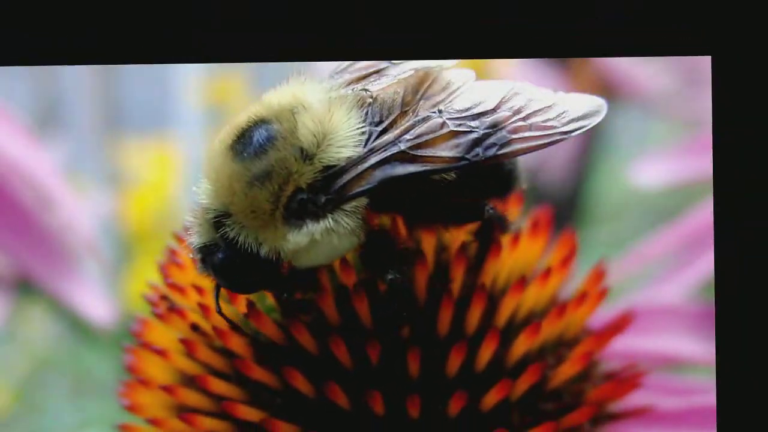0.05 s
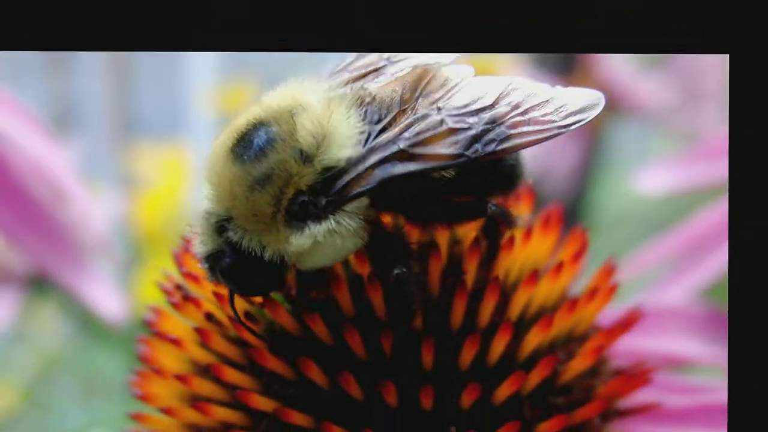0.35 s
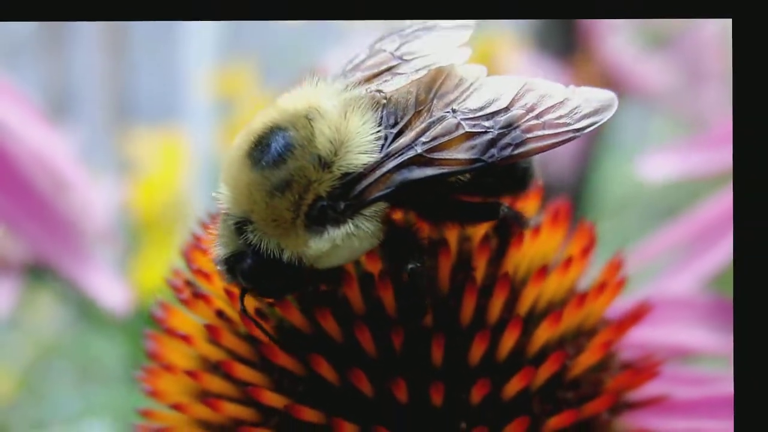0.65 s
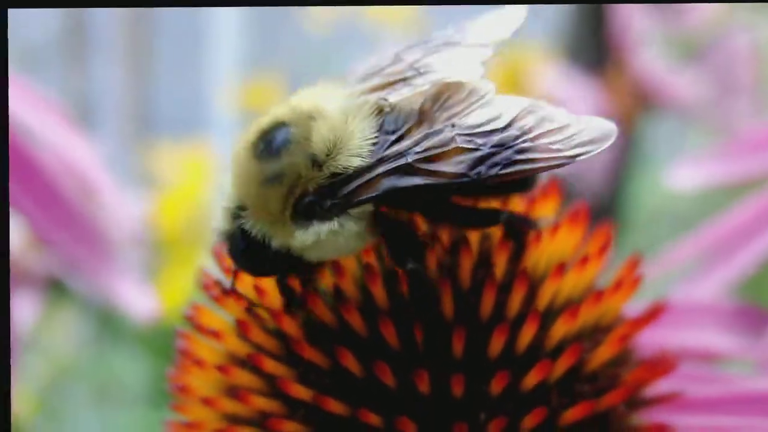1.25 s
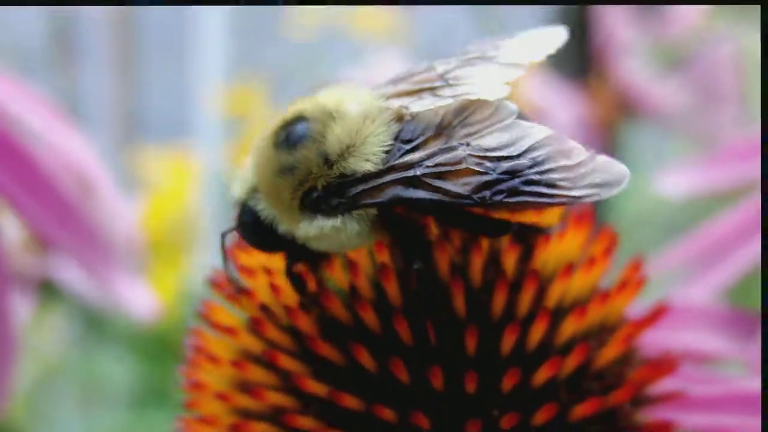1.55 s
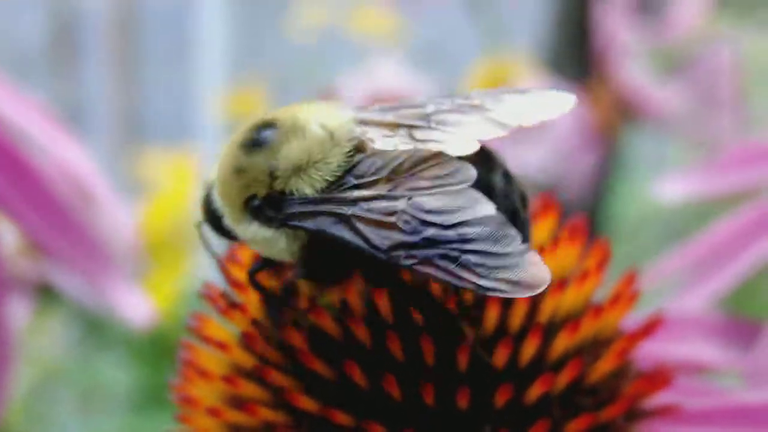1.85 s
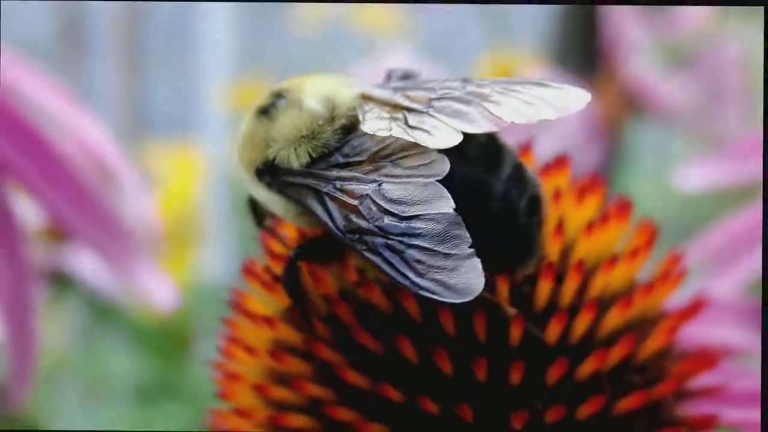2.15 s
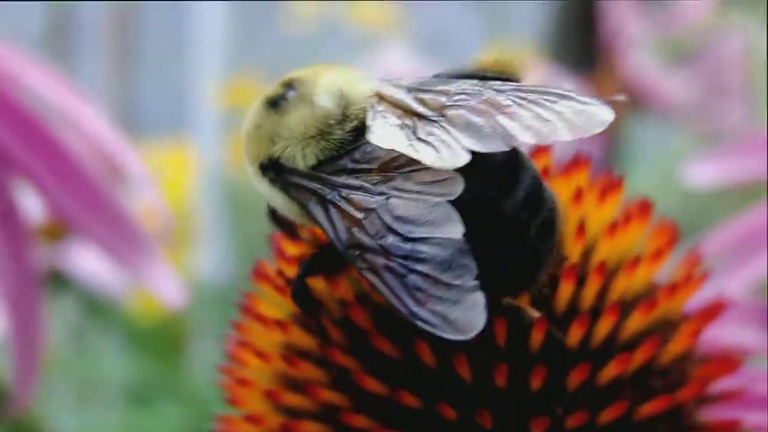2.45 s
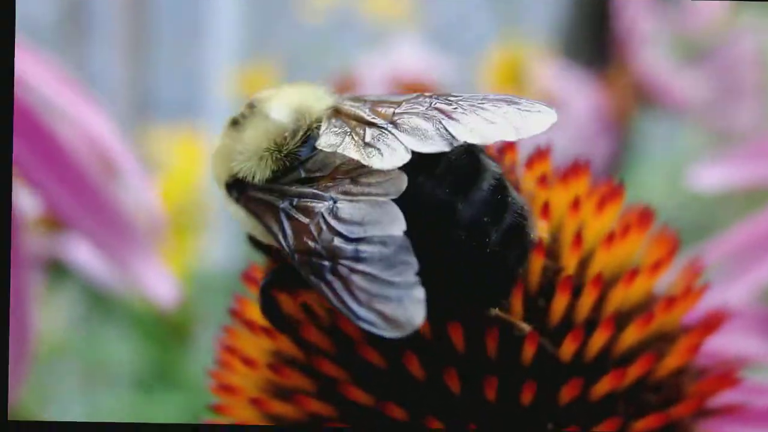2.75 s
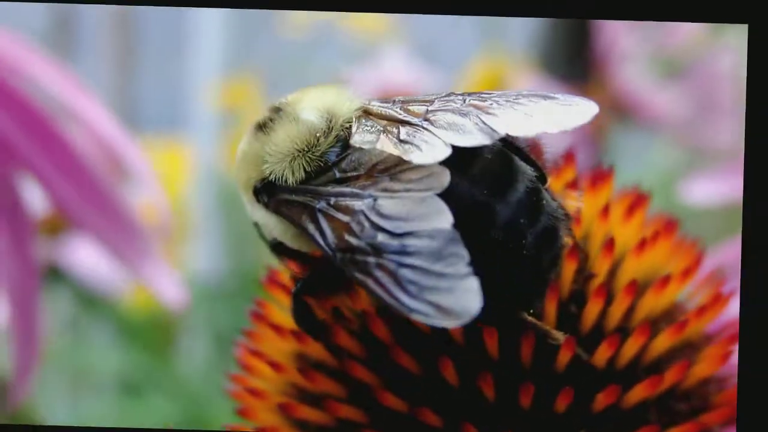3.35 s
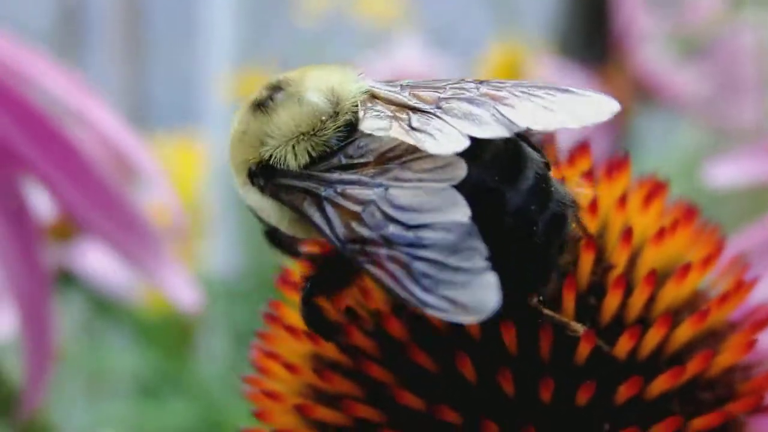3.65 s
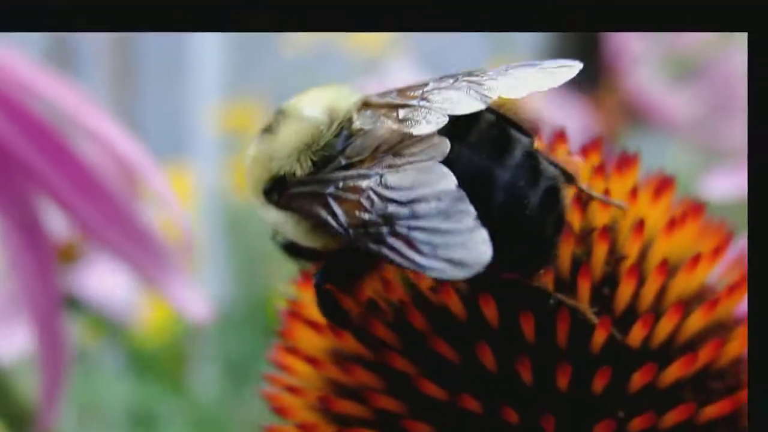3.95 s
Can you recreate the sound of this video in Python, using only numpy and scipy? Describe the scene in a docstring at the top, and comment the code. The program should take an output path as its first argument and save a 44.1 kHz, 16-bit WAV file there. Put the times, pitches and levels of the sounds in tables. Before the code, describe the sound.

Brief, high bird chirps and whistles come about twice a second, with a slight garden echo. Low outdoor rumble and faint hiss continue underneath, and the hand-held microphone is bumped softly midway before the bird calls on.

```python
"""In a garden a small songbird calls nine times: twin-arched chirps, two high "tee-yee" whistles, slurs.
Each call is a frequency-modulated tone with weak harmonics, reflected by ground, fence and walls and
scattered by foliage. Under it lie a few far notes, a steady distant rumble, faint hum and hiss.
Midway, soft bumps set the hand-held microphone rocking."""
import sys
import numpy as np
from scipy import signal
from scipy.fft import rfft, irfft
from scipy.io import wavfile
from scipy.ndimage import uniform_filter1d

SR = 44100
rng = np.random.default_rng(int(sys.argv[2]) if len(sys.argv) > 2 else 0)


def output_pcm(signal):
    """Save a mono or channel-first signal as 16-bit PCM at the path in sys.argv[1].

    Samples are clipped to [-1, 1] before scaling.
    """
    pcm = np.clip(np.atleast_2d(signal).T, -1, 1) * 32767
    wavfile.write(sys.argv[1], SR, np.round(pcm).astype(np.int16))


N = 176400


def undb(db):
    """The decibel scale: amplitude grows tenfold every 20 dB."""
    return 10 ** (np.asarray(db) / 20)


def unit_rms(x):
    """Normalisation to a root-mean-square amplitude of 1."""
    return x / np.sqrt(np.mean(x ** 2))


def wander(corner_hz):
    """Low-pass filtering turns white noise into smooth random motion of rms 1."""
    f = np.arange(N // 2 + 1) * SR / N
    return unit_rms(irfft(rfft(rng.standard_normal(N)) / (1 + (f / corner_hz) ** 2) ** 2, N))


def coloured_noise(spectrum):
    """Spectral shaping: noise of rms 1 that follows (frequency [Hz], relative level [dB]) points."""
    hz, db = np.array(spectrum, float).T
    f = np.arange(N // 2 + 1) * SR / N
    gain = undb(np.interp(np.log(f + 1), np.log(hz), db))
    return unit_rms(irfft(rfft(rng.standard_normal(N)) * gain, N))


def background():
    """Superposition of a gently swelling distant rumble, a faint hum and an even hiss."""
    # noise spectra: (frequency [Hz], relative density [dB])
    rumble_spectrum = [(15, -33), (28, -4), (70, 0.5), (120, -2.5), (200, -3.5), (300, -11.5), (400, -12.5),
                       (620, -11.5), (1000, -16.5), (1500, -20), (2300, -23.5), (3300, -25), (5000, -30),
                       (6500, -36), (9000, -42)]
    hiss_spectrum = [(3000, -18), (6000, 4), (8500, 0.5), (10500, -1), (13000, -8), (15500, -7)]
    # steady tones: (frequency [Hz], level [dB])
    hum_tones = [(119, -61), (360, -71), (699, -81)]
    rumble_db, swell_db, hiss_db = -52.5, .5, -71.5
    t = np.arange(N) / SR
    rumble = undb(rumble_db + swell_db * wander(2.4)) * coloured_noise(rumble_spectrum)
    hum = sum(undb(db) * np.sin(2 * np.pi * hz * t + wander(4.6)) for hz, db in hum_tones)
    return rumble + hum + undb(hiss_db) * coloured_noise(hiss_spectrum)


def gliding_tone(contour, second_db, waver, flutter):
    """A throat resonance lifts the second harmonic of low notes. Returns the tone and its envelope."""
    throat_hz, throat_width_hz, throat_db = 3420, 480, 3.5
    edge_s, third_db = .0054, -42
    t = np.arange(N) / SR
    times, hz, db = np.array(contour, float).T
    pitch = uniform_filter1d(np.interp(t, times, hz), size=130) * waver
    gate = np.clip(np.minimum(t - times[0], times[-1] - t) / edge_s + .5, 0, 1)
    envelope = gate * undb(np.interp(t, times, db)) * flutter
    phase = 2 * np.pi * np.cumsum(pitch) / SR
    resonance = np.exp(-.5 * ((2 * pitch - throat_hz) / throat_width_hz) ** 2)
    second_gain = undb(second_db) + undb(throat_db) * resonance
    wave = np.sin(phase) + second_gain * np.sin(2 * phase) + undb(third_db) * np.sin(3 * phase)
    return np.sqrt(2) * envelope * wave, envelope


def songbird():
    """Random frequency and amplitude modulation roughen each call; a fizz follows its envelope."""
    # call contours: (time [s], pitch [Hz], relative level [dB])
    far_whistle = [(.0, 5140, -66), (.05, 5230, -69), (.12, 5400, -78)]
    chirp_1 = [(.240, 2800, -54), (.248, 3884, -42.5), (.262, 4450, -45.5), (.270, 4110, -43),
               (.273, 3870, -35.5), (.280, 2924, -45), (.290, 3420, -38), (.298, 3414, -40),
               (.304, 2860, -45), (.313, 2750, -55), (.321, 4040, -51)]
    whistle_1 = [(.853, 5000, -59), (.864, 5100, -53), (.872, 5800, -44.5), (.886, 6150, -47.5),
                 (.892, 6050, -63), (.898, 5880, -41), (.907, 5100, -52), (.929, 4690, -53),
                 (.948, 5000, -50), (.962, 4830, -42.5), (.973, 5020, -45), (.984, 5310, -45),
                 (1.002, 5440, -52)]
    chirp_2 = [(1.282, 3110, -45), (1.288, 4046, -48), (1.296, 5320, -57), (1.305, 3980, -48),
               (1.312, 3390, -39.5), (1.323, 2598, -66), (1.332, 3240, -40), (1.339, 3975, -49.5),
               (1.352, 3130, -46), (1.358, 2260, -52.5), (1.365, 2870, -49.5), (1.382, 2330, -55)]
    low_call = [(1.720, 1692, -66), (1.731, 1960, -62), (1.739, 2205, -57), (1.757, 2270, -55),
                (1.766, 2130, -56)]
    far_note = [(1.98, 3200, -65), (2.04, 3044, -67), (2.08, 3100, -72)]
    long_slur = [(2.108, 5650, -72), (2.118, 5455, -67), (2.122, 5200, -49), (2.141, 4500, -55),
                 (2.149, 4364, -63), (2.157, 4020, -51), (2.168, 3800, -67), (2.182, 4400, -57),
                 (2.193, 4050, -46.5), (2.209, 3363, -44.5), (2.221, 2820, -49.5), (2.239, 2220, -55.5),
                 (2.256, 2020, -60), (2.283, 1740, -61), (2.299, 1645, -65)]
    chirp_3 = [(2.613, 2913, -51), (2.622, 4600, -43.5), (2.635, 4640, -42.5), (2.641, 4410, -50),
               (2.645, 3986, -34.5), (2.651, 3300, -49), (2.663, 2874, -50), (2.668, 3337, -37),
               (2.681, 3496, -35), (2.693, 2950, -46.5), (2.708, 2775, -51), (2.715, 3630, -62)]
    whistle_2 = [(2.978, 4900, -51), (2.988, 5050, -59), (2.999, 5900, -40.5), (3.007, 6500, -55.5),
                 (3.022, 6000, -39.5), (3.032, 4900, -57), (3.060, 4700, -66), (3.080, 4560, -47),
                 (3.090, 4630, -46), (3.102, 5170, -43.5), (3.113, 5300, -48.5), (3.128, 5450, -42)]
    chirp_4 = [(3.359, 2900, -61), (3.369, 3934, -39.5), (3.378, 4427, -45.5), (3.385, 3750, -39),
               (3.392, 3890, -36.5), (3.398, 2894, -44), (3.409, 3410, -38.5), (3.422, 2980, -47.5),
               (3.432, 2754, -44), (3.439, 4080, -54)]
    chirp_5 = [(3.761, 3820, -54), (3.769, 4540, -41), (3.778, 5800, -60), (3.788, 4660, -48),
               (3.798, 4500, -43.5), (3.811, 3090, -70), (3.818, 3430, -47), (3.830, 4050, -47),
               (3.845, 3560, -54), (3.859, 2960, -57)]
    # a second voice, sung over other calls: (time [s], pitch [Hz], relative level [dB])
    rasp_1 = [(.275, 4700, -51), (.279, 5180, -50), (.285, 6200, -61), (.297, 6700, -57), (.304, 5070, -55),
              (.310, 4420, -47), (.316, 4100, -61)]
    hoarse_chip = [(1.712, 3100, -59), (1.724, 3400, -46.5), (1.733, 3890, -55), (1.750, 3980, -56),
                   (1.764, 3840, -58)]
    rasp_2 = [(3.389, 4600, -54), (3.396, 5120, -48), (3.402, 6100, -55), (3.417, 6600, -59),
              (3.424, 5540, -52), (3.430, 4420, -48), (3.436, 4100, -56)]
    # faint scratchy slurs, most just before a call:
    # (time [s], duration [s], first pitch [Hz], last pitch [Hz], relative level [dB])
    grace_notes = [(.155, .018, 6600, 5900, -68), (0.23, 0.0135, 4700, 5640, -54),
                   (0.839, .013, 6100, 6300, -59), (1.272, .013, 4650, 5320, -54),
                   (1.633, .018, 3300, 3150, -61), (1.706, .02, 6100, 4740, -63),
                   (1.707, .014, 3900, 3800, -57), (2.601, 0.0142, 4700, 5640, -52.5),
                   (3.351, .012, 4400, 5830, -55), (3.625, 0.046, 3000, 3400, -62.5)]
    # treble fizz that rises and falls with the calls: (frequency [Hz], relative density [dB])
    fizz_spectrum = [(1500, -6), (3000, 0), (6000, -1.5), (8000, -2.5), (11000, -3), (15500, -6)]
    # timbre of each call: (contour, second harmonic [dB], roughness [share of pitch])
    calls = [(far_whistle, -40, .028), (chirp_1, -30, .0156), (rasp_1, -20, .07),
             (whistle_1, -24, .013), (chirp_2, -38, .016), (hoarse_chip, -30, .04),
             (low_call, -24, .0502), (far_note, -40, .04), (long_slur, -30, .00786),
             (chirp_3, -29, .011), (whistle_2, -23, .0128), (chirp_4, -27, .0225),
             (rasp_2, -19, .064), (chirp_5, -28, .0139)]
    for start, duration, first_hz, last_hz, db in grace_notes:
        calls.append(([(start, first_hz, db), (start + duration, last_hz, db)], -42, .04))
    bird_db, fizz_db, flutter_db = -3, -20.5, 2.5
    waver = wander(corner_hz=757)
    flutter = undb(flutter_db * wander(corner_hz=310))
    tones, envelope = sum(np.array(gliding_tone(contour, second_db, 1 + roughness * waver, flutter))
                          for contour, second_db, roughness in calls)
    fizz = undb(fizz_db) * envelope * coloured_noise(fizz_spectrum)
    return undb(bird_db) * (tones + fizz)


def delayed(x, delay_s):
    """Propagation delay: sound on a longer path arrives later."""
    return np.pad(x, (round(delay_s * SR), 0))[:N]


def foliage_scatter(x, t60_s, db):
    """Diffuse scattering: dense reflections decay exponentially, by 60 dB in t60_s."""
    # colour of the reflections: (frequency [Hz], relative level [dB])
    scatter_spectrum = [(1500, -3), (2600, 0), (3300, -1), (4100, 2.5), (5300, 3), (6500, -0.5),
                        (9000, -7.5), (15000, -8)]
    decay = np.exp(-np.log(1000) * np.arange(SR) / SR / t60_s)
    response = coloured_noise(scatter_spectrum)[:SR] * decay
    return undb(db) * signal.fftconvolve(x, response / np.linalg.norm(response))[:N]


def garden_reflections(direct):
    """Interference with the ground bounce makes each glide swell and dip; echoes and scatter follow."""
    # reflections from fence and walls: (delay [s], level [dB])
    hard_surfaces = [(.0034, -15), (.0085, -10.5), (.039, -15.5), (.049, -16.5)]
    ground_s, ground_db = .001766, -9
    ground = undb(ground_db) * delayed(direct, ground_s)
    echoes = sum(undb(db) * delayed(direct, delay_s) for delay_s, db in hard_surfaces)
    near = foliage_scatter(direct, t60_s=.19, db=-12)
    blurred = direct * wander(corner_hz=420)  # modulation sidebands spread the pitch
    far = foliage_scatter(blurred, t60_s=.7, db=-14)
    return direct + ground + echoes + near + far


def microphone_bumps():
    """Transient vibration: each bump rocks the microphone for a cycle or two."""
    # Gaussian pulses: (time [s], frequency [Hz], half-width [s], level [dB])
    bumps = [(2.340, 105, 0.0064, -39), (2.417, 85, 0.0073, -40), (2.424, 42.4, .02, -38),
             (2.534, 55, .012, -46)]
    t = np.arange(N) / SR
    return sum(undb(db) * np.exp(-((t - centre) / width) ** 2) * np.sin(2 * np.pi * hz * (t - centre))
               for centre, hz, width, db in bumps)


def scene():
    """Linear superposition of the bird, its reflections, the background and the bumps in one channel."""
    return (garden_reflections(songbird()) + background() + microphone_bumps())[None]


def record(dry):
    """The microphone's frequency response: a narrow notch in the treble and a steep low-pass."""
    notch_hz, notch_half_width_hz, notch_depth, cutoff_hz = 7870, 320, .69, 15700
    f = np.arange(N // 2 + 1) * SR / N
    notch = 1 - notch_depth / (1 + ((f - notch_hz) / notch_half_width_hz) ** 2)
    low_pass = signal.ellip(10, .1, 70, cutoff_hz, fs=SR, output="sos")
    return signal.sosfilt(low_pass, irfft(rfft(dry) * notch, N))


dry = scene()
out = record(dry)
output_pcm(out)
```